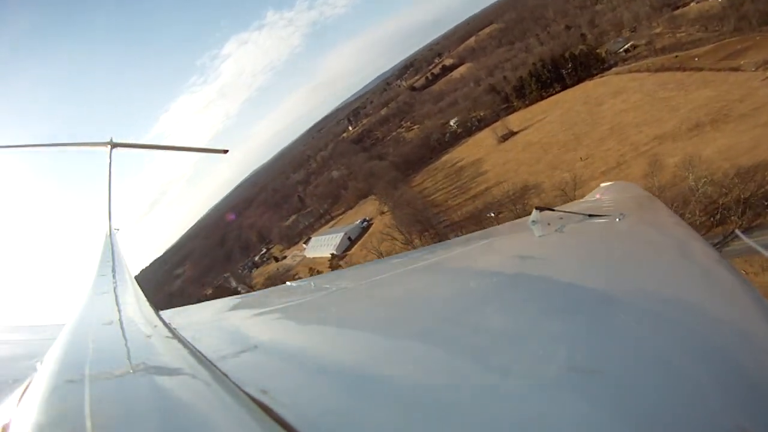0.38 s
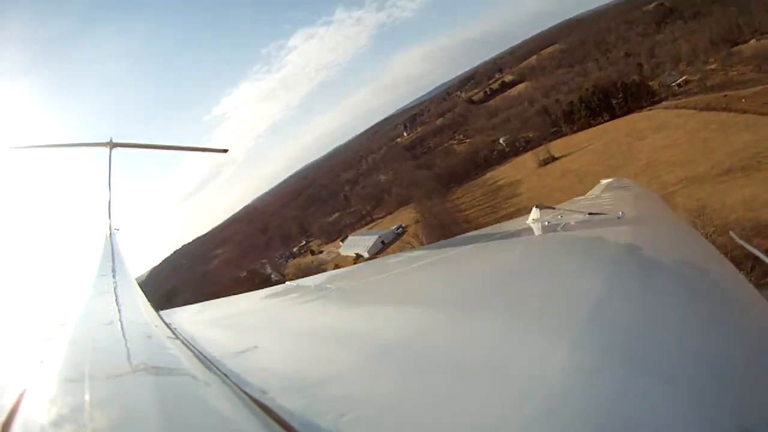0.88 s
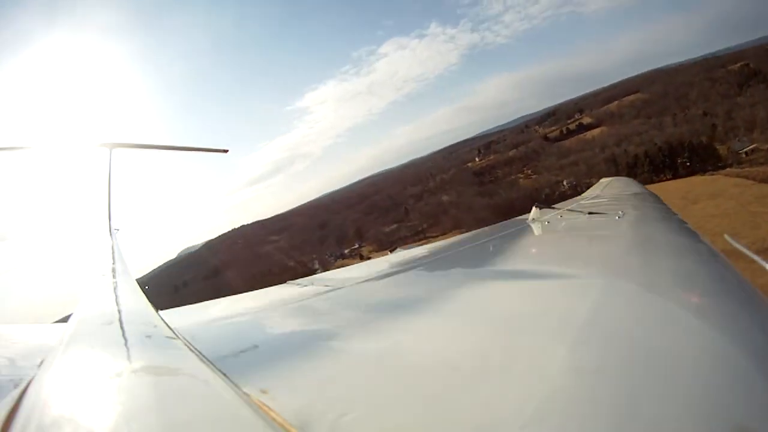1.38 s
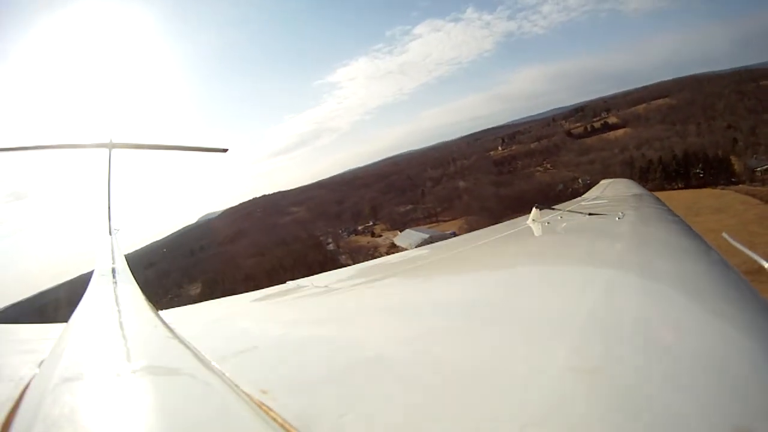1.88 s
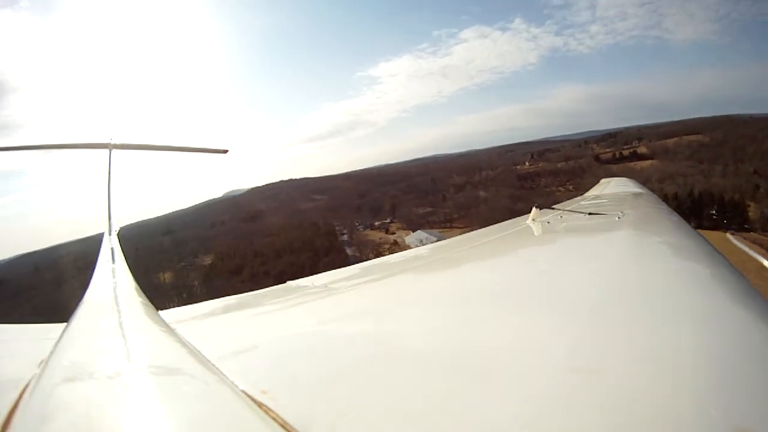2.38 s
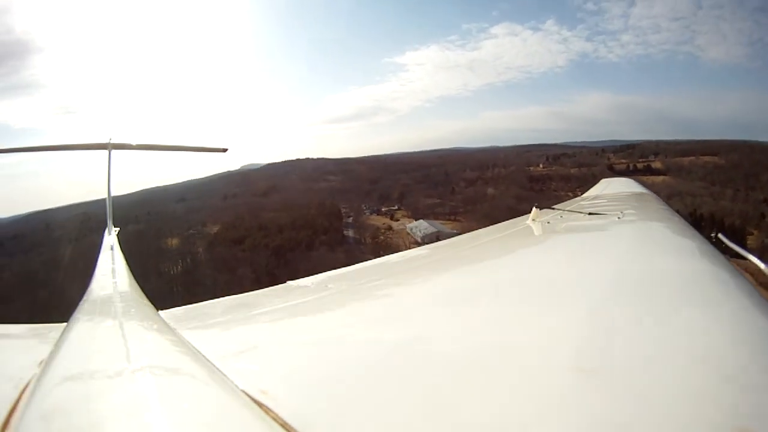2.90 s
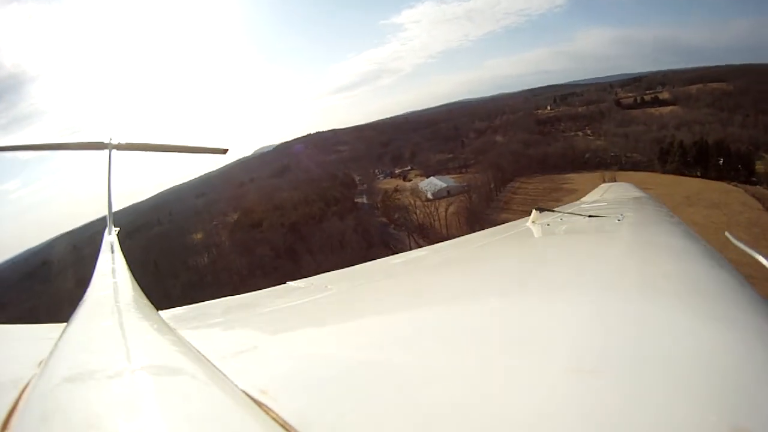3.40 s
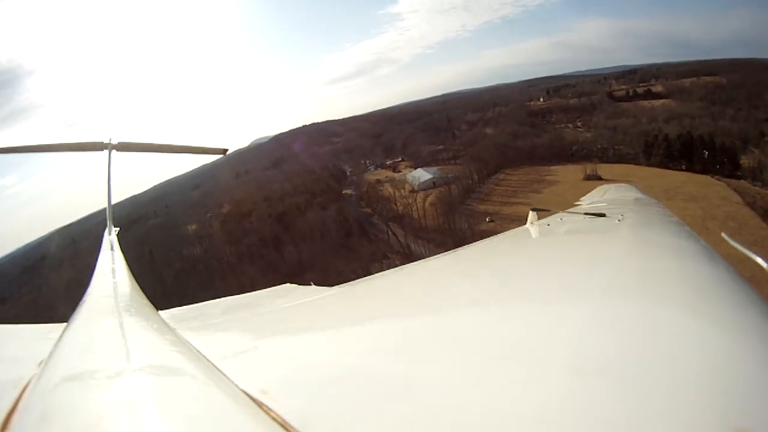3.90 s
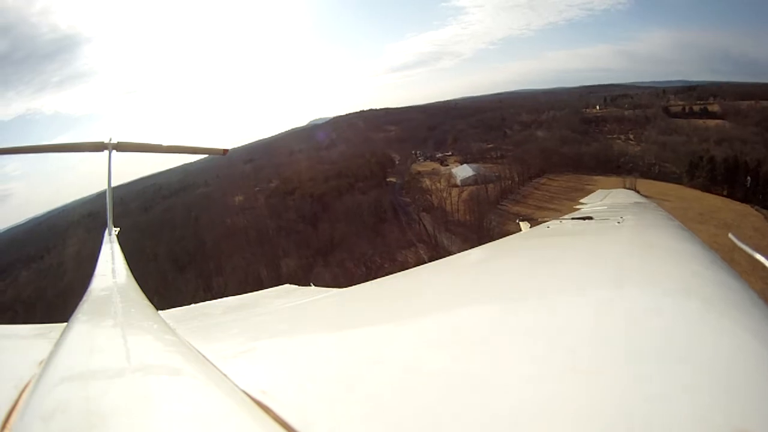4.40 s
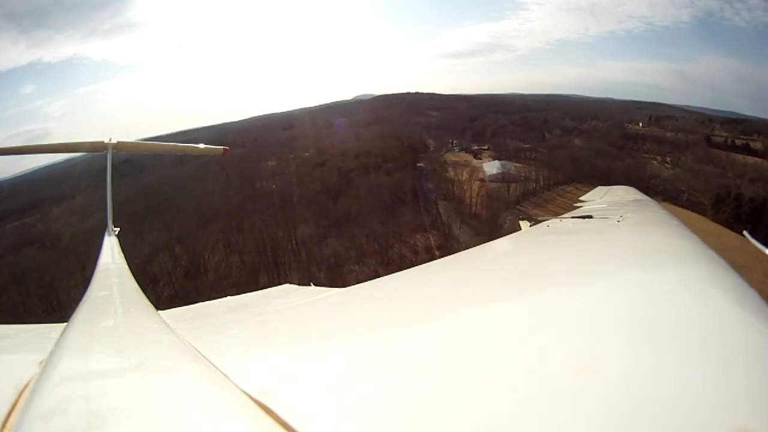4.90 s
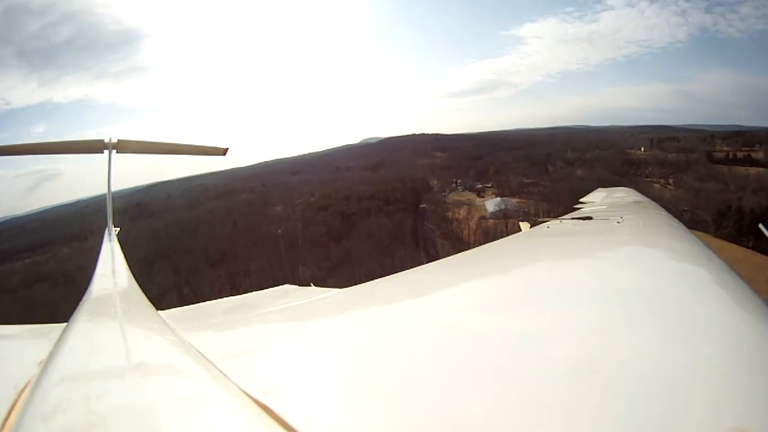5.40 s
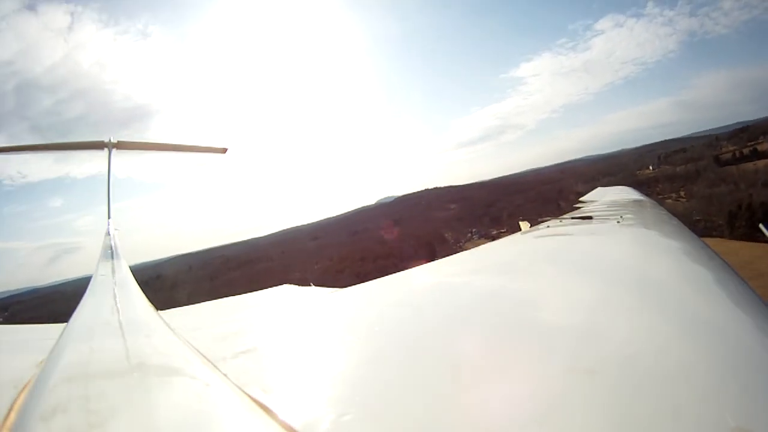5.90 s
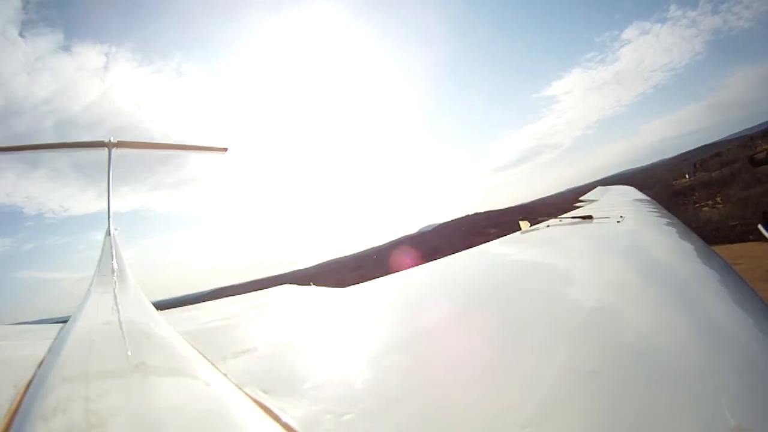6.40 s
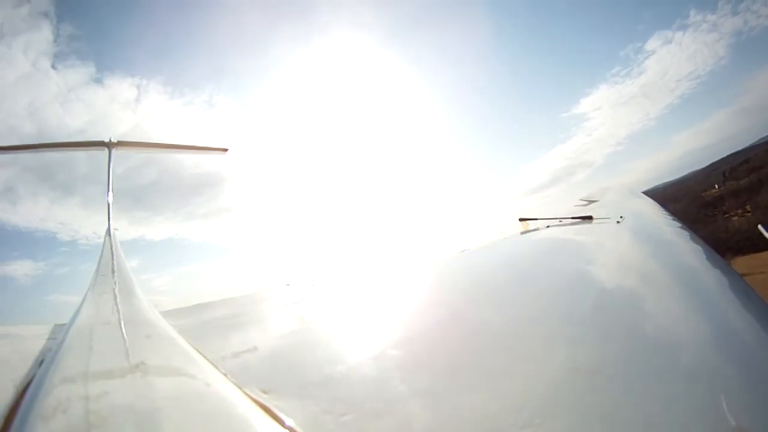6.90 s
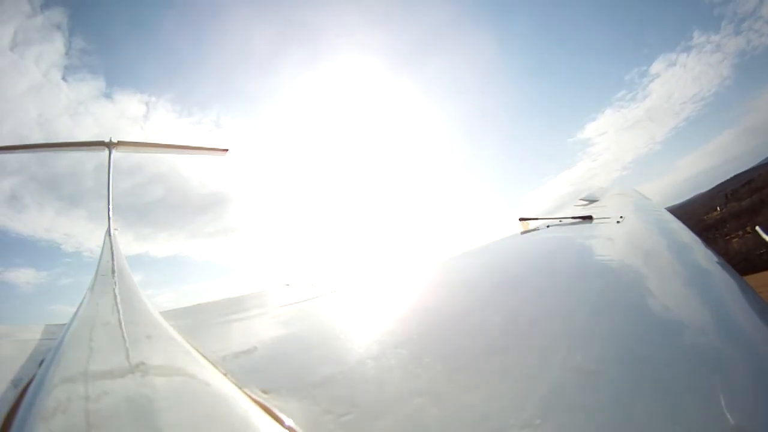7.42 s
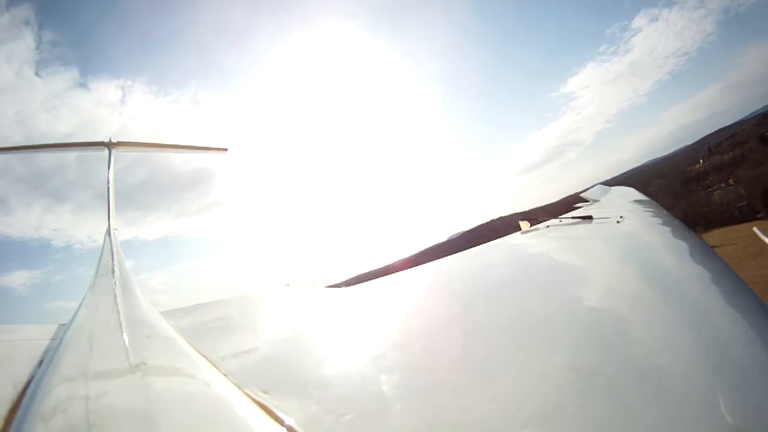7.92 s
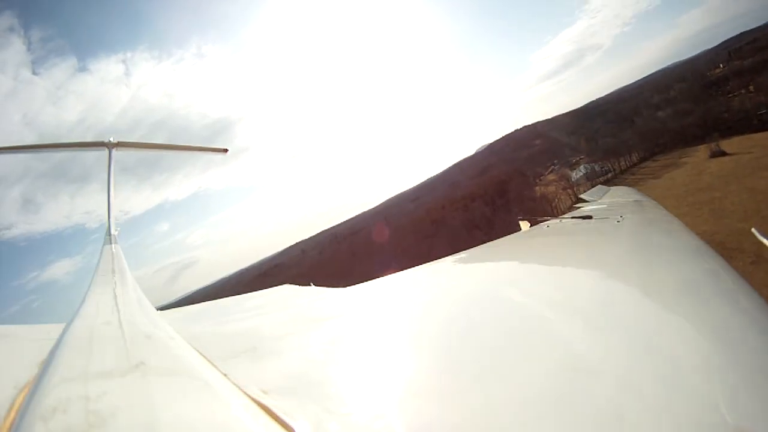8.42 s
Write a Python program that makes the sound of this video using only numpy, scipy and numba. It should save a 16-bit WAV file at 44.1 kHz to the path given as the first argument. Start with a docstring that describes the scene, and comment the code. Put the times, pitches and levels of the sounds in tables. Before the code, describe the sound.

Close, raw onboard wind noise in open air: a bassy, unsteady flutter, a mid-low roar and a faint, coarse high hiss. Irregular pressure thumps strike throughout, the heaviest near 1.7 seconds, each briefly pushing everything else down. In the second half the treble darkens and a control servo adds quiet dry chatter and short scraping twitches, ringing in a small hollow case. The wind continues to the end; no room echo.

```python
"""A low buffeting, a roar and a hiss: air streams over the one microphone of a small camera on a gliding model aircraft.
All three are coloured noise, driven by one curve of gusts. Strong eddies thump the port as paired swings of pressure
and make the gain control duck. Later a control servo chatters through the airframe, as scrapes that ring its case.
The camera samples slowly and repeats each sample, so the roar is mirrored as a high hiss."""
import sys
import numpy as np
from scipy import signal
from scipy.fft import rfft, irfft, next_fast_len
from scipy.io import wavfile
from scipy.ndimage import uniform_filter1d, map_coordinates
from numba import njit

SR = 44100
rng = np.random.default_rng(int(sys.argv[2]) if len(sys.argv) > 2 else 0)


def unload_audio(sound):
    """Save the sound as a 16-bit wav file, at the path given as the first command line argument."""
    columns = np.transpose(np.atleast_2d(sound))
    # keep every value between -1 and 1, then stretch to whole-number steps
    steps = np.round(np.clip(columns, -1, 1) * 32767)
    wavfile.write(sys.argv[1], SR, steps.astype(np.int16))


def volts_from_decibels(level):
    """Turn decibel levels (scalar or array-like) into linear amplitude factors."""
    exponent = np.asarray(level, float) / 20
    return 10 ** exponent


N = 376613

# strength of the airflow: [start_s, roar_db]
GUST_STRENGTH = [(0, -24), (0.61, -26.5), (0.92, -24), (1.3, -25.5), (1.62, -23.5), (1.95, -27),
                 (2.74, -22.5), (3.05, -27), (3.36, -25), (3.66, -28), (4.27, -22), (4.58, -26.5),
                 (4.95, -21.5), (5.49, -24.5), (6.2, -22), (7.0, -24), (7.32, -21.5), (7.8, -23),
                 (8.24, -21.5), (8.54, -28)]
# slow change of colour: [start_s, buffet_db before the gusts act on it, treble_loss_db]
AIR_COLOUR = [(0, -15, 2), (1.2, -14.5, 0), (4.6, -16, -0.5), (5.0, -18.5, 5.5), (5.5, -19, 10),
              (6.1, -19.5, 10), (6.7, -17, 11.5), (7.3, -14.5, 6), (7.9, -15.5, 9.5), (8.25, -15, 5.5),
              (8.54, -13, 2)]
# shape of the low buffeting's spectrum: [pitch_hz, level_db per Hz]
BUFFET_SPECTRUM = [(11, -32), (18, -10), (48, 0.5), (91, -0.5), (142, -0.5), (400, -14.5), (520, -23.5),
                   (880, -120)]
# shape of the roar's spectrum: [pitch_hz, level_db per Hz]
ROAR_SPECTRUM = [(150, -22), (250, -3.5), (459, -6), (823, -8.5), (986, -13), (1340, -30.5), (1500, -38),
                 (1950, -52.5), (3300, -120)]
# shape of the hiss's spectrum: [pitch_hz, level_db per Hz]
HISS_SPECTRUM = [(710, -29), (1200, -4.5), (1320, -11.5), (1560, -10.5), (1960, -13.5), (2120, -13.5),
                 (2510, -13.5), (3120, -16), (4060, -58), (6860, -120)]
# shape of the spectrum of the highest, finest hiss: [pitch_hz, level_db per Hz]
FIZZ_SPECTRUM = [(1970, -31), (3350, -1.5), (4020, -2.5), (4870, -5), (5440, -11), (5950, -17.5),
                 (7740, -55), (13100, -120)]
# strong eddies striking the port: [middle_s, peak_db before the gain control, swing_hz]
STRONG_EDDIES = [(0.371, 0.5, 104), (0.611, -4, 156), (1.145, -1, 105), (1.2549, -1, 122),
                 (1.4398, -0.5, 114), (1.6713, 8.5, 95), (2.1102, -3, 95), (2.2844, -2.5, 161),
                 (2.5017, -1, 138), (2.858, 0.5, 199), (3.1037, 4.5, 178), (3.2432, -3.5, 90),
                 (3.5291, -0.5, 133), (3.5738, 0.5, 146), (3.768, -2, 122), (3.991, -2, 105),
                 (4.258, -0.5, 110), (4.532, -3, 83), (4.6329, 0.5, 74), (4.868, 1, 172),
                 (5.5865, 0.5, 140), (6.6803, -3, 83), (6.742, -1, 182), (7.0009, 0.4, 148),
                 (7.2246, -2, 75), (7.4479, 0, 142), (7.644, -2, 124), (8.0799, -7.5, 165),
                 (8.2078, -1, 109.5), (8.386, -2, 70.4)]
# servo at work: [start_s, length_s, relative chatter_db]
SERVO_BOUTS = [(5, 0.16, -40), (5.2, 0.24, -46), (5.576, 0.095, -45), (5.765, 0.066, -42.5),
               (6.927, 0.045, -48.5), (7.12, .3, -58), (7.58, .3, -45.5), (7.9, 0.47, -49.5)]
# single servo twitches: [start_s, relative strength_db]
SERVO_TWITCHES = [(5.3305, -28), (5.401, -34.5), (5.5077, -28.5), (6.9656, -33), (7.0167, -30),
                  (7.291, -27.5), (7.5637, -35), (7.63, -38), (7.6979, -38), (7.821, -31), (7.9019, -35),
                  (7.999, -36), (8.064, -28), (8.095, -31), (8.2826, -33)]
# resonances of gear case and skin: [pitch_hz, width_hz, relative level_db]
CASE_MODES = [(1570, 180, 4.5), (2270, 230, 1), (2810, 240, -1.5), (3800, 400, -13), (4950, 450, -12)]
# how the flicker between the channels compares with the sound: [pitch_hz, level_db]
FLICKER_LEVEL = [(100, -32.5), (300, -33), (700, -39), (1500, -18), (3000, -12.5), (6000, -3.5),
                 (8000, -9.5), (10000, -21), (13000, -34)]


def unit(x):
    """Scales a sound to rms 1."""
    return x / np.sqrt(np.mean(x ** 2) + 1e-20)


def curves(rows):
    """Draws straight lines between table rows: one curve for each column after the time."""
    times, *columns = np.transpose(rows)
    return [np.interp(np.arange(N) / SR, times, column) for column in columns]


def wobble(rate):
    """A smooth random curve through a given number of random points a second."""
    points = rng.standard_normal(int(N * rate / SR) + 4)
    return map_coordinates(points, [np.arange(N) * rate / SR])


def filtered(x, response):
    """Shapes a sound by multiplying its spectrum with a response to frequency."""
    size = next_fast_len(N + 8192)  # spare room, so that ringing does not wrap around
    return irfft(rfft(x, size) * response(np.fft.rfftfreq(size, 1 / SR)), size)[:N]


def rush(spectrum, lumps_db):
    """Rushing air: noise of rms 1, its size stirred by turbulence before it takes its colour."""
    pitch_hz, level_db = np.transpose(spectrum)

    def colour(hz):
        return volts_from_decibels(np.interp(np.log(hz + 1), np.log(pitch_hz + 1), level_db))

    return unit(filtered(volts_from_decibels(lumps_db) * rng.standard_normal(N), colour))


def airflow():
    """One gust strength drives all layers; passing eddies swell them together; each also flutters on its own."""
    buffet_follows = 0.4  # share of the gusts' swing in the buffet
    hiss_dulls = 0.61  # share of the treble loss in the hiss
    roar_db, = curves(GUST_STRENGTH)
    buffet_db, dull_db = curves(AIR_COLOUR)
    buffet_db = buffet_db + buffet_follows * (roar_db - roar_db.mean())
    hiss_db = roar_db - 18 - hiss_dulls * dull_db
    fizz_db = roar_db - 27.5 - dull_db

    eddies, ripple = wobble(38), wobble(110)
    swings, cover, ahead_db = thumps()
    buffet = rush(BUFFET_SPECTRUM, 1.2 * eddies + 2.0 * wobble(90))
    buffet = buffet * volts_from_decibels(-12 * cover)  # a covered port catches less of it
    roar = rush(ROAR_SPECTRUM, 0.76 * eddies + 1.36 * ripple + 0.59 * wobble(60))
    hiss = rush(HISS_SPECTRUM, 0.77 * eddies + 0.36 * ripple + 1.0 * wobble(200))
    fizz = rush(FIZZ_SPECTRUM, 0.73 * eddies + 0.58 * ripple + 0.55 * wobble(250))

    low = swings + volts_from_decibels(buffet_db) * buffet
    middle = volts_from_decibels(roar_db + 0.29 * ahead_db) * roar
    high = volts_from_decibels(0.34 * ahead_db) * (volts_from_decibels(hiss_db) * hiss + volts_from_decibels(fizz_db) * fizz)
    return low + middle + high


def thumps():
    """Each eddy sucks at the port, then pushes, and covers it meanwhile; the air quickens ahead of strong ones."""
    suck_share = 0.62  # first swing as a share of the second
    weak_count, weak_db, weak_hz = 8, -5, 95  # weaker eddies: strongest level, middling swing
    swings, cover, ahead_db = np.zeros((3, N))
    t = np.arange(N) / SR
    weak = [(when * N / SR, weak_db - 2.5 * softer, weak_hz * (0.75 + 0.6 * faster))
            for when, softer, faster in rng.random((weak_count, 3))]
    for middle_s, peak_db, swing_hz in STRONG_EDDIES + weak:
        near = slice(max(int((middle_s - 0.03) * SR), 0), int((middle_s + 0.03) * SR))
        u = (t[near] - middle_s) * 4 * swing_hz  # the two peaks lie at -1 and 1
        swing = np.abs(u) * np.exp((1 - u ** 4) / 4)
        swings[near] += volts_from_decibels(peak_db) * swing * np.where(u < 0, -suck_share, 1)
        cover[near] = np.maximum(cover[near], np.exp(-(u / 1.96) ** 4))
        build_up = np.exp(np.minimum(t - middle_s, 0) / 0.071) * (t < middle_s)
        ahead_db += max(peak_db + 5.5, 0) * build_up
    return swings, cover, ahead_db


def scrape(attack_s, t60_s):
    """The loudness of one gear scrape: a quick rise, then a fade of 60 dB in t60_s."""
    t = np.arange(SR // 12) / SR
    return (1 - np.exp(-t / attack_s)) * volts_from_decibels(-60 * t / t60_s)


def case(hz):
    """The gear case and skin ring at several pitches, with alternating sign, and pass little very high treble."""
    ringing = 0
    for k, (centre, width, level_db) in enumerate(CASE_MODES):
        mode = 1j * hz * width / (centre * centre - hz * hz + 1j * hz * width)
        ringing = ringing + (-1) ** k * volts_from_decibels(level_db) * mode
    return ringing / (1 + (hz / 5600) ** 16)


def servo():
    """Every drive pulse jerks the gears: a short scrape that rings the case. A bout rises fast and fades slower."""
    frame_hz = 72.5  # the receiver drives the servo once a frame
    rise_db_per_s, fade_db_per_s = 301, 150
    frames = np.arange(int(N / SR * frame_hz)) / frame_hz
    bouts_db = []
    for start_s, length_s, level_db in SERVO_BOUTS:
        early_s = np.maximum(start_s - frames, 0)
        late_s = np.maximum(frames - start_s - length_s, 0)
        bouts_db.append(level_db - rise_db_per_s * early_s - fade_db_per_s * late_s)
    chatter_db = np.max(bouts_db, axis=0)

    luck = rng.standard_normal((len(frames), 2))  # uneven timing and uneven strength
    at = np.clip((frames + 0.0014 * luck[:, 0]) * SR, 0, N - 1).astype(int)
    kicks = np.zeros(N)
    kicks[at] = volts_from_decibels(chatter_db + 1.6 * luck[:, 1])
    shape = volts_from_decibels(6) * signal.fftconvolve(kicks, scrape(attack_s=0.0014, t60_s=0.047))[:N]
    twitch = scrape(attack_s=0.0008, t60_s=0.017)
    for start_s, strength_db in SERVO_TWITCHES:
        shape[int(start_s * SR):][:len(twitch)] += volts_from_decibels(strength_db) * twitch
    noise = rng.standard_normal(N)
    return filtered(shape * noise, case) / np.std(filtered(noise, case))


def scene():
    """One microphone feeds both channels."""
    mono = airflow() + servo()
    return np.array([mono, mono])


@njit
def follow(level_db, ceiling_db, fall_db, climb_db, ease):
    """Gain in dB: sinks while the output is over the ceiling, else climbs back, faster from a deep duck."""
    gain = np.zeros(len(level_db))
    for i in range(1, len(gain)):
        if level_db[i] + gain[i - 1] > ceiling_db:
            gain[i] = gain[i - 1] - fall_db
        else:
            gain[i] = min(gain[i - 1] * (1 - ease) + climb_db, 0.0)
    return gain


def gain_control(x, ceiling_db, fall_db_per_ms, climb_db_per_s, ease_s, tick_s):
    """The longer a peak stays over the ceiling, the deeper the duck; the gain moves in small steps."""
    level_db = 20 * np.log10(np.abs(x) + 1e-6)
    fall_db = fall_db_per_ms * 1000 / SR  # per sample, as is the climb
    gain_db = follow(level_db, ceiling_db, fall_db, climb_db_per_s / SR, 1 / (ease_s * SR))
    tick = max(int(tick_s * SR), 1)
    steps = gain_db[np.arange(N) // tick * tick]
    return x * volts_from_decibels(uniform_filter1d(steps, size=13)), gain_db


def held(x):
    """Sampled at 12000 Hz, every sample repeated: the staircase mirrors the bass around that rate."""
    repeats = 4
    x = filtered(x, lambda hz: 1 / (1 + (hz / 5930) ** 120))  # the converter closes just under half its rate
    slow = signal.resample_poly(x, 40, 147)  # 44100 Hz to 12000 Hz
    return signal.resample_poly(np.repeat(slow, repeats), 147, 40 * repeats)[:N]


def flicker(x, gain_db, threshold, per_duck_db):
    """Faint noise flickers between the channels in short patches, more as the gain sinks, sized by the sound."""
    hz, t, z = signal.stft(x, SR, nperseg=2048)
    at = (t * SR).astype(int)
    before_db = gain_db[np.clip(at - 700, 0, N - 1)]
    after_db = gain_db[np.clip(at + 700, 0, N - 1)]
    bands = np.digitize(hz, [300, 1100, 2500, 4300, 5600, 8300, 10400])
    luck = (rng.random((8, len(t))) + rng.random(len(t))) / 2  # partly shared by the 8 bands
    patches = (luck < threshold + per_duck_db * (before_db - after_db))[bands]
    pitch_hz, level_db = np.transpose(FLICKER_LEVEL)
    gain = volts_from_decibels(np.interp(np.log(hz + 1), np.log(pitch_hz), level_db))
    turn = np.exp(2j * np.pi * rng.random(z.shape))  # random phases make it noise
    return signal.istft(np.abs(z) * gain[:, None] * patches * turn, SR, nperseg=2048)[1][:N]


def low_pass(x):
    """Removes everything above the highest recorded frequency."""
    return signal.sosfilt(signal.butter(12, 15710, fs=SR, output="sos"), x)


def record(dry):
    """Gain control, soft overload, slow sampling with repeated samples, a band limit and the channel flicker."""
    mono, gain_db = gain_control(dry[0], ceiling_db=-7.0, fall_db_per_ms=2.5, climb_db_per_s=43,
                                 ease_s=0.15, tick_s=0.0007)
    rounded = mono / (1 + np.abs(mono / 0.92) ** 6) ** (1 / 6)  # peaks bend toward 0.92
    mono = filtered(held(rounded), lambda hz: 1 / (1 + (hz / 15400) ** 150))
    side = flicker(mono, gain_db, threshold=0.24, per_duck_db=0.091)
    return low_pass(np.array([mono + side, mono - side]))


dry = scene()
out = record(dry)
unload_audio(out)
```